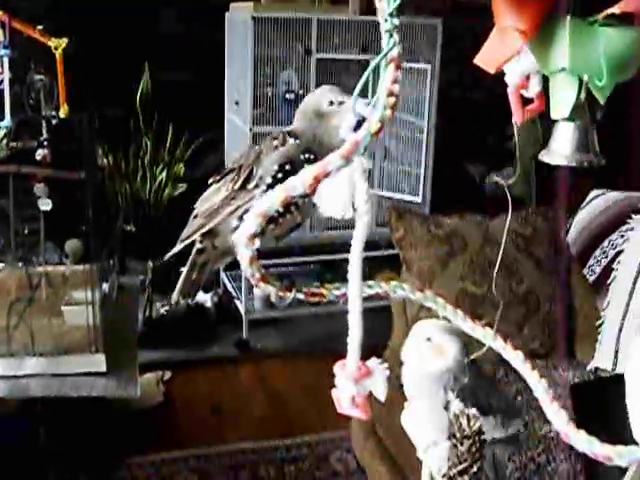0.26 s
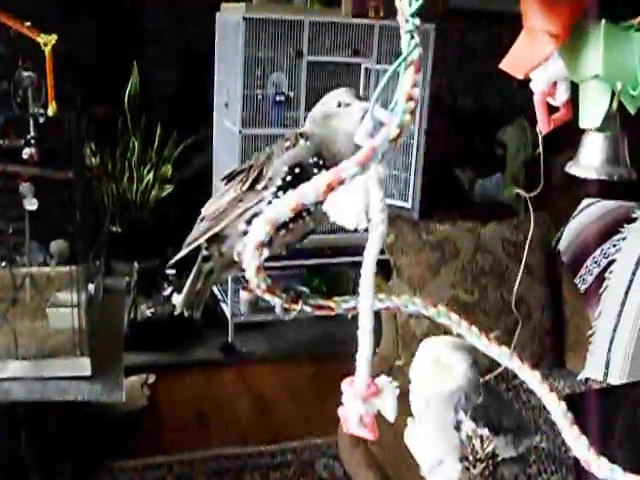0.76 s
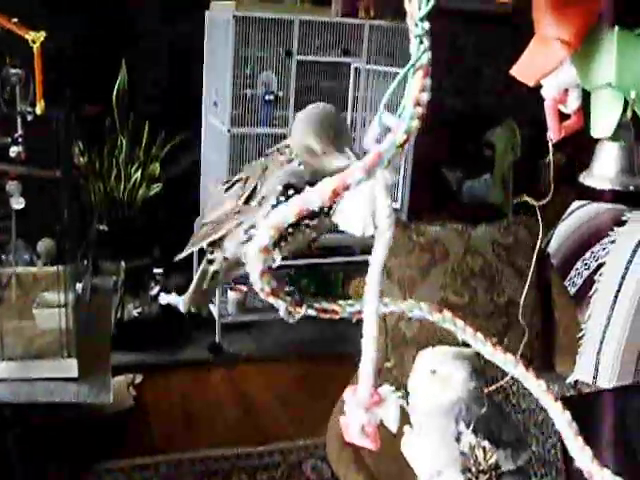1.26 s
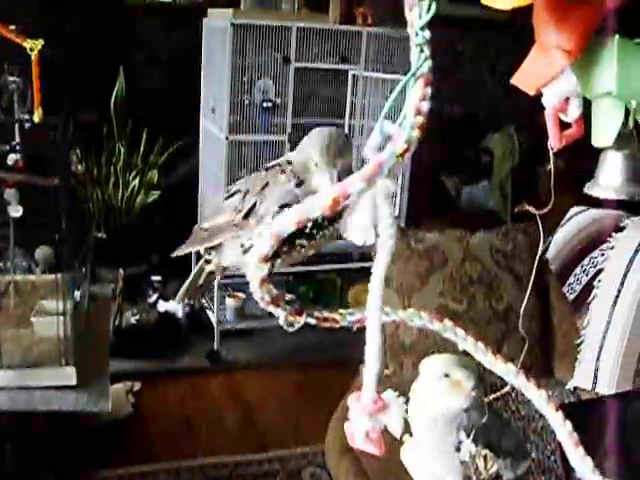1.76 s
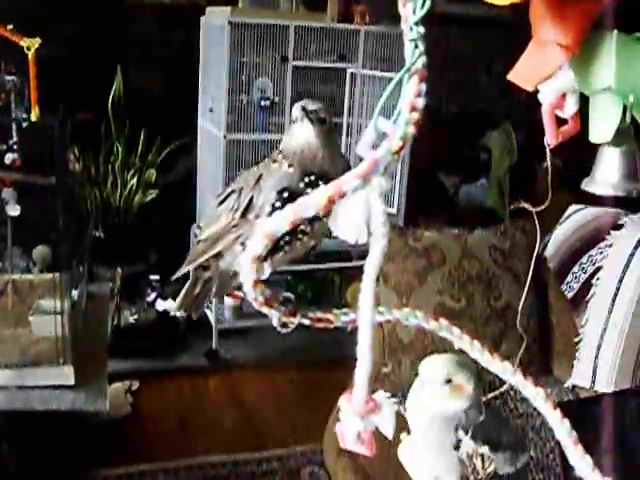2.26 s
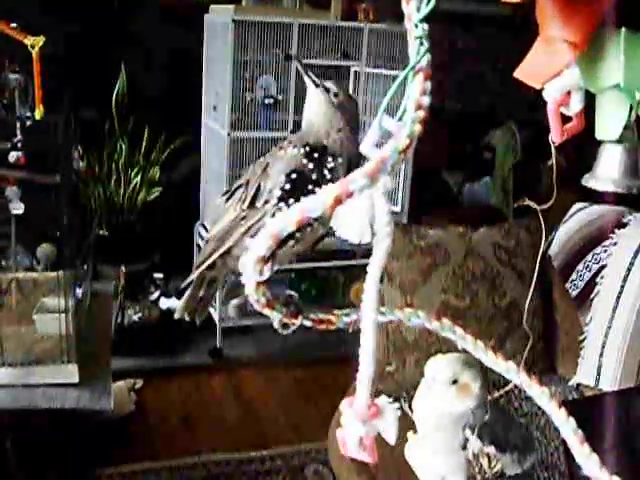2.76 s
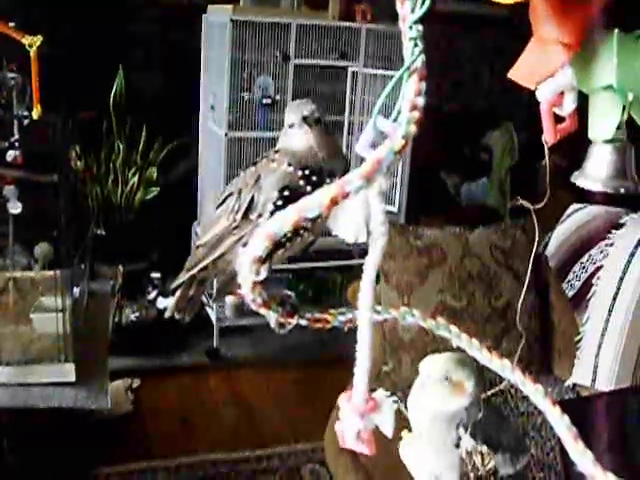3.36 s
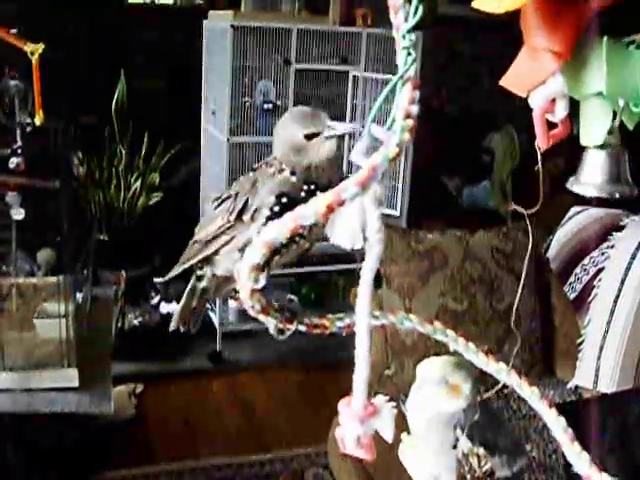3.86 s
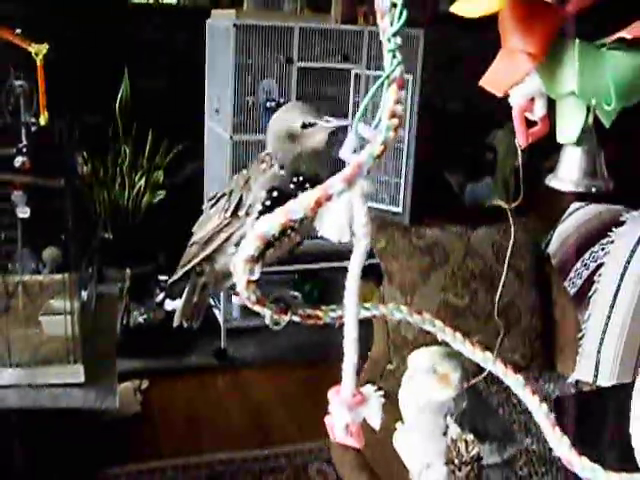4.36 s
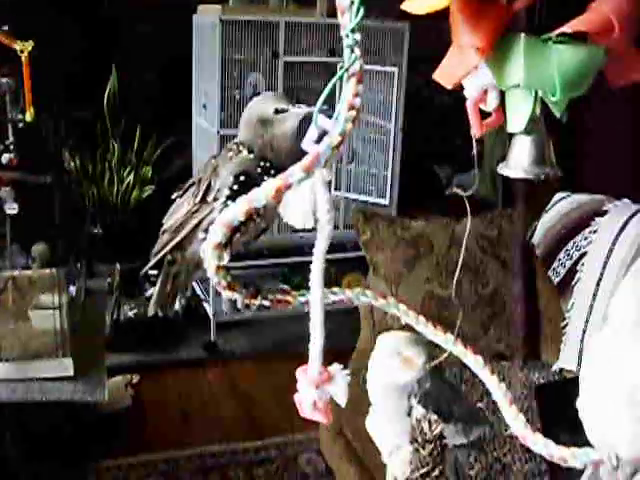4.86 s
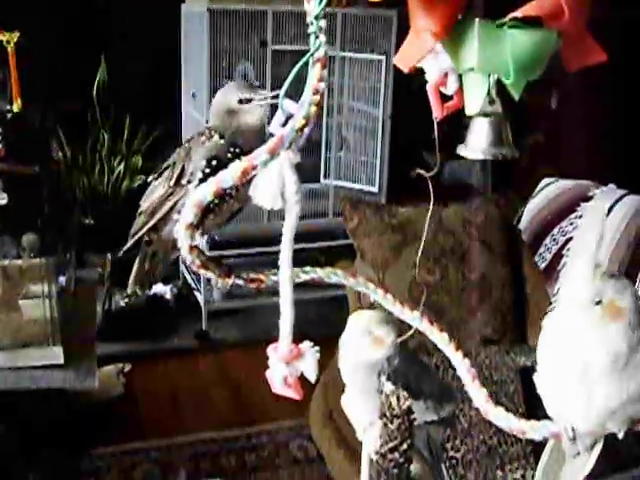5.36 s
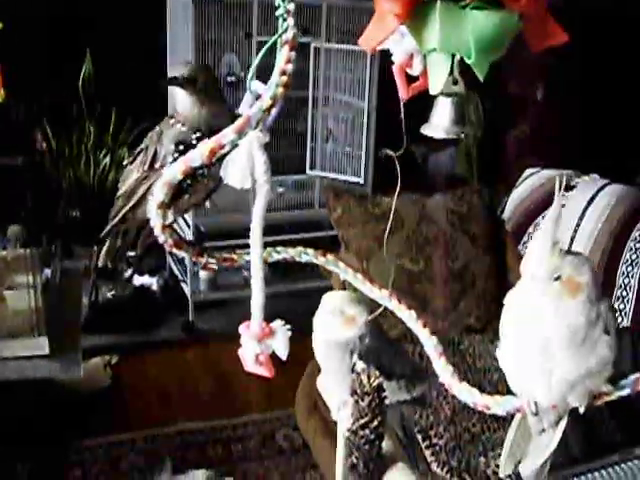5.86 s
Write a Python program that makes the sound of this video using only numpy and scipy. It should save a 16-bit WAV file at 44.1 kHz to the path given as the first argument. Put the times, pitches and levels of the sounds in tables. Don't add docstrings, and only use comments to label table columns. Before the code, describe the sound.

A pet starling on a rope perch gives gliding whistles, sharp double chips, soft chatter and thin high notes over faint camera hiss.

```python
import sys
import numpy as np
from scipy import signal
from scipy.fft import rfft, irfft
from scipy.io import wavfile
from scipy.ndimage import uniform_filter1d

SR = 44100
rng = np.random.default_rng(int(sys.argv[2]) if len(sys.argv) > 2 else 0)


def wrap_up_sound(samples):
    columns = np.atleast_2d(samples).T
    tamed = np.clip(columns, -1, 1)
    steps = np.round(tamed * 32767).astype(np.int16)
    wavfile.write(sys.argv[1], SR, steps)


def nominal_scale(level):
    x = np.asarray(level, float) / 20
    return 10 ** x


N = 269451
CUTOFF_HZ = 15720
# start_s, level_db
CHIP_STARTS = [
    (1.837, -41),
    (3.567, -42),
    (4.725, -43.5),
]


def at_hz(points, hz):
    table_hz, table_db = np.array(points).T
    return np.interp(np.log(hz), np.log(table_hz), table_db)


def wobble(size, rate_hz):
    r = np.exp(-2 * np.pi * rate_hz / SR)
    settle = 2000
    white = rng.standard_normal(max(size, 8000) + settle)[:size + settle]
    slow = signal.lfilter([1], [1, -2 * r, r * r], white)[settle:]
    return slow * np.sqrt((1 - r * r) ** 3 / (1 + r * r))


def coloured(white, gain):
    hz = np.maximum(np.fft.rfftfreq(len(white), 1 / SR), 10)
    return irfft(rfft(white) * gain(hz), len(white))


def glides(rows):
    return [[(s, from_hz, db), (s + length_s, to_hz, db)] for s, length_s, from_hz, to_hz, db in rows]


def whistles():
    # time_s, pitch_hz, level_db, pressing_db (more gives stronger overtones)
    slow_arch = [
        [(0.175, 1000, -58, -5), (0.182, 1114, -54, -2), (0.193, 1120, -57, -10), (0.205, 1485, -47.5, -15),
         (0.235, 1711, -47, -14), (0.25, 1823, -38, -13), (0.275, 1836, -53, -9), (0.29, 1940, -41.5, -14),
         (0.301, 1860, -46, -6)],
        [(0.306, 1974, -50, -18), (0.316, 2088, -46.5, -26), (0.345, 2122, -44.5, -30),
         (0.357, 2260, -43.5, -19), (0.368, 2320, -48, -14), (0.392, 2225, -43.5, -17),
         (0.402, 1920, -45.5, -21), (0.42, 1690, -44.5, -16), (0.433, 1516, -44.5, -12)],
        [(0.438, 1500, -48, -4), (0.47, 1430, -50.5, -4.5), (0.505, 1398, -53.5, 3), (0.522, 970, -58, -5)],
    ]
    big_arch = [
        [(0.663, 994, -56, -16.5), (0.68, 1400, -58, 9.5), (0.692, 1492, -46.5, 2.5), (0.706, 1595, -52, 13),
         (0.714, 1620, -68, 14)],
        [(0.72, 1620, -64, 17), (0.73, 1635, -62.5, 6), (0.747, 1846, -48, 6), (0.768, 2050, -49.5, -8),
         (0.78, 2100, -38, -16), (0.79, 2133, -36, -21), (0.802, 2470, -37, -23), (0.815, 2460, -41.5, -19)],
        [(0.82, 2510, -39, -9), (0.85, 2940, -38, -10), (0.875, 2720, -37, -11), (0.89, 2654, -45, -12),
         (0.917, 2738, -43.5, -11), (0.932, 2866, -43.5, -5), (0.96, 2367, -41, -18), (0.98, 1590, -51.5, -9)],
    ]
    high_swoop = [
        [(1.062, 8070, -68, 2), (1.076, 5870, -46.5, -25), (1.087, 5830, -51, -18), (1.092, 5400, -45, -8),
         (1.106, 5200, -46.5, -6), (1.115, 4500, -42, -12), (1.125, 4650, -45.5, -6), (1.14, 4660, -43, -3),
         (1.148, 4310, -36.5, -11)],
        [(1.153, 4500, -38.5, -3), (1.162, 4520, -46, 1), (1.18, 5010, -38.5, -4.5), (1.2, 5870, -35.5, -1),
         (1.215, 6280, -41, 0), (1.232, 6520, -42, 3), (1.242, 6170, -50, -3), (1.253, 5800, -53, -9)],
        [(1.256, 5740, -47, 0), (1.263, 4320, -46, -2), (1.272, 4500, -61, -23)],
    ]
    short_arch = [
        [(1.354, 1370, -68.5, 8), (1.363, 1470, -54, -1), (1.375, 1637, -55.5, -1), (1.39, 1845, -45.5, 1),
         (1.415, 1888, -45, 3.5), (1.425, 2080, -38, -7), (1.437, 2550, -40.5, -25), (1.452, 2545, -39.5, -7)],
        [(1.464, 2718, -38.5, -11.5), (1.495, 2924, -40, -3), (1.518, 2756, -41.5, -3),
         (1.525, 2677, -54.5, -10), (1.54, 2660, -44, -16)],
    ]
    warble = [
        [(3.89, 1375, -60.5, -14), (3.898, 1480, -51.5, -16), (3.91, 1830, -44.5, -9), (3.918, 1810, -43, -3),
         (3.923, 1948, -44.5, 5), (3.937, 1908, -44.5, 2), (3.946, 1815, -50, 3), (3.95, 1580, -52, 4)],
        [(3.954, 1648, -57, 0), (3.965, 1543, -56.5, 4), (3.982, 1603, -52, 10.5), (4.005, 1572, -47.5, 5),
         (4.012, 1922, -46.5, 8), (4.027, 2710, -43.5, -2), (4.046, 2270, -40.5, -23), (4.058, 2450, -41, -10),
         (4.069, 1816, -38.5, -4), (4.08, 1634, -51, 3)],
        [(4.083, 1700, -45, 2), (4.092, 1700, -44, 3), (4.1, 1530, -45, 3), (4.1055, 2200, -45, 3),
         (4.11, 1600, -46, 3), (4.116, 1650, -45, 3), (4.135, 1650, -46, 4), (4.164, 1610, -51, 3)],
        [(4.169, 1517, -51, 6.5), (4.187, 1369, -54.5, 1), (4.2, 1410, -53.5, 5.5), (4.213, 1420, -56.5, -5),
         (4.232, 1437, -62, -3)],
    ]
    step_arch = [
        [(5.407, 1335, -55, 1), (5.413, 1471, -56.5, 5.8), (5.424, 1398, -56.5, 9.8), (5.436, 1771, -47.5, 8.7),
         (5.453, 1770, -41.5, 3), (5.457, 1818, -46.5, 7.2), (5.472, 1800, -47.5, 11.2),
         (5.498, 1800, -45.5, 9.9), (5.505, 1916, -43, 4.4)],
        [(5.508, 1890, -52, 3), (5.524, 2333, -38.5, 2), (5.536, 2844, -37, -12), (5.555, 2931, -37.5, -4),
         (5.572, 2780, -33.5, -10), (5.6, 2370, -39.5, -20), (5.612, 1990, -38, -27), (5.622, 1550, -55.5, -10)],
    ]
    # start_db, middle_db, end_db
    beak_moves = [(-19, 4, -1.5), (-3, 10, 2), (-8, -8, -1), (0, -5, 1), (7, 6.5, 17), (6, 10, 10),
                  (20, 28, 20), (23, 15, 10), (18, 20, 18), (5, -5.5, -7), (0.5, -2, -1), (17, 10, -5),
                  (4, 1.5, -11), (1, -1.5, -5), (-9, -7, -10), (4, 1, -0.5), (0, -4.5, 16)]
    notes = []
    for note, beak in zip(slow_arch + big_arch + high_swoop + short_arch + warble + step_arch, beak_moves):
        beak_db = np.interp(np.linspace(0, 2, len(note)), range(3), beak)
        notes.append(np.column_stack([note, beak_db]))
    return syrinx(notes, jitter=.008, shimmer_db=1.5, rasp=.1, edge_s=.004)


def syrinx(notes, jitter, shimmer_db, rasp, edge_s):
    # freq_hz, level_db
    throat = [(2000, 50), (4000, 9.5), (5500, -1.5), (6800, -4), (8000, 0.5), (9500, -4), (11000, -17.5),
              (12500, -21), (14000, -32), (15500, -35)]
    quiver = 1.3
    order_fall_db, odd_db, third_db, patchy_db = 0.5, -1.5, 0.5, 3.0
    out = np.zeros(N)
    for rows in notes:
        s, pitch_hz, *controls = np.transpose(rows)
        at = np.arange(max(round((s[0] - edge_s) * SR), 0), min(round((s[-1] + edge_s) * SR), N))
        t = at / SR
        unsteady = 1 + jitter * (wobble(len(t), 70) + quiver * wobble(len(t), 220))
        share, swing_db = trill(t)
        pitch = uniform_filter1d(np.interp(t, s, pitch_hz), size=90) * unsteady * share
        phase = 2 * np.pi * np.cumsum(pitch) / SR
        edge = np.clip(np.minimum(t - s[0], s[-1] - t) / edge_s + 1, 0, 1) ** 2
        levels = [np.interp(t, s, c) for c in controls]
        rich = len(levels) > 1
        if rich:
            levels = overtones(pitch, *levels)
        for k in range(1, 10 if rich else 2):
            flicker_db = shimmer_db * min(k, 4) ** .6 * np.clip(wobble(len(t), 90), -1.7, 1.7)
            level_db = levels[min(k, 3) - 1] + flicker_db + swing_db
            if k > 2:
                level_db = level_db + at_hz(throat, k * pitch) - order_fall_db * max(k - 6, 0)
                level_db = level_db + odd_db * (k in (5, 7)) + third_db * (k == 3)
                level_db = level_db + patchy_db * wobble(len(t), 20)
            hoarse = 1 + rasp * min(k, 4) ** .5 * 2 * np.tanh(wobble(len(t), 700) / 2)
            partial = np.sin(k * phase + k * k) * (k * pitch < CUTOFF_HZ)
            out[at] += hoarse * np.sqrt(2) * nominal_scale(level_db) * edge * partial
    return out


def overtones(pitch, level_db, press_db, beak_db=0):
    # freq_hz, level_db re fundamental
    windpipe = [(2000, 6.5), (3900, -5), (4300, -7.5), (6000, -21), (8300, -20), (9200, -0.5),
                (10300, -27.5), (13000, -18.5)]
    octave_db = level_db + press_db + at_hz(windpipe, 2 * pitch)
    upper_db = -22 + press_db - 4 * np.log2(pitch / 2000) + beak_db
    upper_db = upper_db + .25 * (level_db + 46)
    return level_db, octave_db, level_db + upper_db


def trill(t):
    # first_top_s, end_s, rate_hz, pitch_share, level_db
    trill_rows = [(1.1790, 1.24, 190, .03, 4), (4.1840, 4.24, 69, .13, 1), (4.1340, 4.162, 62, .022, 1),
                  (6.0500, 6.11, 170, .035, 5), (1.468, 1.54, 75, .012, 1.5), (4.118, 4.135, 110, .015, 2),
                  (0.953, 0.985, 120, .01, 3), (0.692, 0.775, 80, .015, 2.5), (5.4615, 5.51, 94, .008, 3.5),
                  (5.585, 5.625, 135, .01, 4), (0.4450, 0.51, 90, .025, 2.5), (0.2550, 0.33, 55, .02, 1),
                  (0.342, 0.43, 65, .012, 2.5)]
    # time_s, pitch_share, level_db
    flick_rows = [(0.261, 0.067, -7), (0.281, -0.0046, 5.5), (0.367, 0.016, 6.5), (0.412, 0.044, 9),
                  (0.466, -0.047, -5), (0.774, -0.019, -1), (0.781, 0.01, 1), (0.786, 0.0047, -7),
                  (0.826, -0.0029, -2), (0.862, -0.003, -4.5), (0.881, -0.0072, -4), (0.889, 0.013, 1),
                  (0.284, -0.0068, 2), (3.977, 0.037, -1), (5.482, 0.0264, 0), (0.303, -0.0041, -5),
                  (0.907, 0.0065, -1), (0.87, 0.00019, 0), (1.443, -0.008, 3.5), (5.539, 0.0026, 6),
                  (0.929, -0.0062, -7), (0.94, 0.0062, -8), (1.131, -0.018, 3), (1.46, 0.0086, -8),
                  (1.489, -0.0021, 3), (1.499, 0.0067, -2), (3.989, 0.079, 3), (4.016, 0.0034, 8),
                  (4.039, 0.012, -2), (4.178, -0.062, 1), (5.488, 0.011, -3.5), (5.547, 0.011, -2),
                  (5.581, 0.0065, -10)]
    lead_s, ramp_s, flick_s = .018, 0.014, 0.0059
    share, swing_db = np.zeros(len(t)), np.zeros(len(t))
    for top_s, end_s, rate_hz, depth, level_db in trill_rows:
        ramp = np.clip(np.minimum(t - top_s + lead_s, end_s - t) / ramp_s, 0, 1)
        beat = np.cos(2 * np.pi * rate_hz * (t - top_s)) * ramp
        share, swing_db = share + depth * beat, swing_db + level_db * beat
    for s, depth, level_db in flick_rows:
        flick = np.clip(1 - abs(t - s) / flick_s, 0, 1)
        share, swing_db = share + depth * flick, swing_db + level_db * flick
    return 1 + share, swing_db


def chips():
    # after_s, pitch_hz, level_db, pressing_db
    chip_shape = [
        [(0.001, 2800, -18, 8), (0.005, 2984, -12, 12), (0.0095, 3200, -6, 0), (0.012, 3800, -6, -8),
         (0.017, 3850, -19, -6), (0.023, 3880, -12, -8), (0.027, 3800, -21, -4)],
        [(0.0445, 3080, -8, 0), (0.048, 3110, -3, 0), (0.052, 3140, -2, -3), (0.0565, 3150, -9, -5),
         (0.0585, 3400, -3, -6), (0.0605, 3850, -11, -9), (0.064, 3800, -20, -8)],
    ]
    beak_db = -8
    ring_hz, ring_t60_s, ring_db = 3140, 0.1, -5
    notes = []
    for s, db in CHIP_STARTS:
        for note in chip_shape:
            placed = np.array(note) * [1, rng.normal(1, .005), 1, 1] + [s, 0, db, 0]
            notes.append(np.column_stack([placed, np.full(len(note), beak_db)]))
    voice = syrinx(notes, jitter=.006, shimmer_db=1.5, rasp=.15, edge_s=.002)
    r = nominal_scale(-60 / (ring_t60_s * SR))
    poles = [1, -2 * r * np.cos(2 * np.pi * ring_hz / SR), r * r]
    ring = signal.lfilter([1 - r, 0, r - 1], poles, voice + 1e-18)
    return voice + nominal_scale(ring_db) * ring


def chatter():
    # top_s, half_length_s, top_hz, level_db, pressing_db
    syllables = [(4.474, 0.012, 1804, -52.5, -15), (4.49, 0.0087, 1223, -59.5, -3),
                 (4.538, .011, 1617, -58.5, -1), (4.56, 0.014, 1853, -53, -8),
                 (4.579, 0.0071, 1373, -61, -4.5), (4.64, 0.013, 2263, -54, 8.5),
                 (4.665, 0.012, 1700, -61, -12)]
    # time_s, pitch_hz, level_db, pressing_db, beak_db
    lead = [
        [(4.365, 3160, -60, 2, -6), (4.373, 1870, -52.5, -11, 1), (4.378, 2030, -53, -8, 3),
         (4.384, 2840, -63, -6, -8), (4.39, 1920, -50, -5, -3)],
        [(4.368, 4280, -70, -20, -18), (4.374, 2870, -61, -16, -20), (4.383, 4330, -60, -20, -20),
         (4.39, 3240, -61, -20, -20)],
    ]
    # top_s, half_length_s, top_hz, level_db, beak_db
    rattle = [(4.383, 0.0039, 1465, -57, 6), (4.402, 0.0058, 1595, -56, 12),
              (4.4135, 0.0038, 1660, -50, 19.5), (4.426, .004, 1604, -57.5, 15),
              (4.439, 0.0043, 1520, -59, 14), (4.454, 0.005, 1470, -61, 11), (4.474, .003, 1780, -66, 20),
              (4.483, .003, 1495, -69, 12)]
    sag, edge_db, edge_press_db, beak_open_db = .28, -13, -3, 3
    rattle_sag, rattle_edge_db, rattle_press_db = 0.097, -4.5, -1.5
    humps = []
    for s, half_s, hz, db, press_db in syllables:
        end = (hz * (1 - sag), db + edge_db, press_db + edge_press_db, beak_open_db)
        humps.append([(s - half_s, *end), (s, hz, db, press_db, beak_open_db), (s + half_s, *end)])
    beats = []
    for s, half_s, hz, db, beak_db in rattle:
        end = (hz * (1 - rattle_sag), db + rattle_edge_db, rattle_press_db, beak_db)
        beats.append([(s - half_s, *end), (s, hz, db, rattle_press_db, beak_db), (s + half_s, *end)])
    return syrinx(lead + humps + beats, jitter=.008, shimmer_db=1.5, rasp=.13, edge_s=.003)


def hoarse_notes():
    # time_s, pitch_hz, level_db
    old_tail = [
        [(0.0, 2054, -45), (0.012, 1960, -57), (0.035, 1930, -65), (0.14, 1950, -80)],
    ]
    # start_s, length_s, from_hz, to_hz, level_db
    buzz = [(5.92, .018, 5400, 8100, -81), (5.942, 0.01, 6900, 7200, -73), (5.942, .018, 4900, 4730, -82),
            (5.957, .008, 6700, 7300, -70), (5.966, 0.03, 4400, 6200, -76), (5.98, .009, 8000, 9450, -73),
            (5.991, 0.014, 6600, 6800, -61.5), (6.0, 0.024, 8200, 7900, -74),
            (6.011, 0.016, 5600, 6400, -66), (6.022, .018, 4080, 4570, -73),
            (6.036, 0.0077, 5560, 6250, -65), (6.045, 0.016, 6370, 6600, -56.5),
            (6.08, 0.022, 4750, 6600, -67), (6.1, .009, 6650, 6500, -60.5)]
    return syrinx(old_tail + glides(buzz), jitter=.018, shimmer_db=3.0, rasp=.35, edge_s=.003)


def thin_notes():
    # time_s, pitch_hz, level_db
    thin = [
        [(4.853, 8250, -69), (4.868, 8550, -56.5), (4.885, 7920, -59), (4.91, 7370, -68), (4.93, 7700, -56.5),
         (4.942, 7740, -60.5), (4.955, 5900, -72), (4.968, 5080, -76)],
    ]
    # start_s, length_s, from_hz, to_hz, level_db
    faint = [(0.857, .008, 3280, 3980, -54), (0.9, .02, 6600, 6930, -58), (0.901, .02, 9000, 9800, -59),
             (0.901, .009, 3100, 4100, -52), (1.705, .025, 1360, 1280, -70), (4.865, .03, 5200, 4740, -73),
             (4.872, .012, 10200, 9800, -82), (4.92, .015, 4250, 4050, -80),
             (4.918, .012, 14900, 15650, -78), (4.932, .012, 15650, 14600, -77),
             (1.178, .012, 15400, 15500, -72)]
    return syrinx(thin + glides(faint), jitter=.012, shimmer_db=3.0, rasp=.15, edge_s=.004)


def air_events():
    # peak_s, length_s, level_db
    voice_breaks = [(0.511, .013, -74), (0.851, .018, -52), (0.897, .012, -50.5), (0.98, .0071, -72),
                    (1.208, .0025, -51), (3.95, .0041, -68), (4.012, .014, -62), (4.104, .0067, -60)]
    throat_rasps = [(1.259, .0065, -66), (4.199, .027, -68), (4.382, .02, -64), (4.415, .057, -66),
                    (4.468, .03, -64), (4.555, .04, -67), (4.635, .04, -68), (4.5, .03, -68)]
    high_grains = [
        (1.198, 0.0086, -61),
        (4.375, 0.028, -71),
        (4.45, 0.046, -69),
        (4.638, 0.016, -67),
    ]
    soft_washes = [(1.603, .12, -78), (2.926, .15, -79), (4.035, .03, -62), (4.782, .034, -67.5),
                   (4.642, .045, -64), (4.565, .02, -70), (5.138, .1, -78), (5.508, .035, -62)]
    buzz_air = [
        (5.95, 0.036, -71),
        (5.995, 0.047, -66.5),
        (6.058, 0.07, -83),
    ]
    # low_hz, high_hz
    air_bands = [
        (2320, 10200),
        (1280, 5800),
        (8240, 9400),
        (2840, 6400),
        (4500, 9300),
    ]
    # after_s, length_s, low_hz, high_hz, level_db re chip
    chip_air = [(0.005, .012, 2500, 6500, -21), (.047, 0.016, 2400, 5600, -21),
                (.013, 0.027, 8800, 12300, -33), (.014, .012, 5700, 7000, -25), (.05, .02, 5700, 6600, -27),
                (.064, .025, 3500, 4100, -26)]
    kinds = voice_breaks, throat_rasps, high_grains, soft_washes, buzz_air
    rows = []
    for band, events in zip(air_bands, kinds):
        rows += [(s, length_s, *band, db) for s, length_s, db in events]
    for s, db in CHIP_STARTS:
        rows += [(s + after_s, *shape, db + under_db) for after_s, *shape, under_db in chip_air]
    return rows


def puffs():
    tilt_db_per_octave = -4.5
    out = np.zeros(N)
    for s, length_s, low_hz, high_hz, level_db in air_events():
        at = np.arange(round((s - length_s / 2) * SR), min(round((s + 2 * length_s) * SR), N))
        grain_db = 3.5 * wobble(len(at), 200) + trill(at / SR)[1]
        air = rng.standard_normal(SR)[:len(at)] * nominal_scale(grain_db)
        band = signal.butter(4, [low_hz, high_hz], "band", fs=SR, output="sos")
        air = signal.sosfilt(band, air) * np.sqrt(SR / 2 / (high_hz - low_hz))
        late = (at / SR - s) / length_s
        push = np.cos(np.pi * np.where(late < 0, late, late / 4)) ** 2
        out[at] += nominal_scale(level_db) * air * push
    return coloured(out, lambda hz: nominal_scale(tilt_db_per_octave * np.log2(hz / 4000)))


def far_birds():
    # start_s, length_s, from_hz, to_hz, level_db
    calls = [
        (1.29, .07, 2300, 2260, -70),
        (2.42, .25, 2420, 2380, -84),
        (5.13, .08, 2700, 2770, -83),
    ]
    return syrinx(glides(calls), jitter=.015, shimmer_db=3.0, rasp=.4, edge_s=.015)


def fade(rounds):
    return nominal_scale(-60 * rounds) + nominal_scale(-18 - 30 * rounds)


def room(x):
    # freq_hz, t60_s
    room_t60 = [(500, 0.064), (2500, 0.22), (6000, 0.2), (12000, 0.1)]
    room_db, gap_s = -10.5, 0.002
    t, tail = np.arange(SR // 2) / SR, 0
    for hz in 250 * 2 ** np.arange(0, 6.5, .5):
        band = signal.butter(2, [hz / 2 ** .25, hz * 2 ** .25], "band", fs=SR, output="sos")
        tail = tail + signal.sosfilt(band, rng.standard_normal(len(t))) * fade(t / at_hz(room_t60, hz))
    tail = tail * (t > gap_s)
    return nominal_scale(room_db) * signal.fftconvolve(x, tail / np.sqrt(np.sum(tail ** 2)))[:N]


def camera():
    # freq_hz, density_db_per_hz
    hiss_shape = [(12, -29), (20, -2), (137, -3), (650, -13), (707, -10.5), (790, -14), (908, -12.5),
                  (1130, -15), (1230, -15), (2340, -19), (6040, -30.5), (7760, -32.5), (8670, -34.5),
                  (15600, -40.5)]
    slip_times = [1.928, 2.105, 2.39, 3.335, 4.34, 5.19, 5.355]
    # freq_hz, level_db
    tones = [
        (7750, -88),
        (15370, -98),
        (15503, -98),
    ]
    hiss_db, whine_db = -63, -77.5
    whine_hz, flips_per_s, first_flip_s = 7685.5, 58.75, 0.0107
    slip_hz, slip_s = 337.4, 0.007
    t = np.arange(N) / SR
    hiss = coloured(rng.standard_normal(N), lambda hz: nominal_scale(at_hz(hiss_shape, hz)))
    slip = sum(np.exp(-((t - s) / slip_s) ** 2) for s in slip_times)
    sign = np.clip(12 * np.sin(np.pi * flips_per_s * (t - first_flip_s)), -1, 1)
    whine = sign * np.sin(2 * np.pi * np.cumsum(whine_hz + slip_hz * slip) / SR)
    lines = sum(nominal_scale(line_db) * np.sin(2 * np.pi * hz * t) for hz, line_db in tones)
    return nominal_scale(hiss_db) * hiss / np.std(hiss) + np.sqrt(2) * (nominal_scale(whine_db) * whine + lines)


def scene():
    bird = whistles() + chatter() + chips()
    bird += hoarse_notes() + thin_notes() + far_birds()
    bird += puffs()
    return (bird + room(bird) + camera())[None]


def top_cut(x):
    return signal.sosfilt(signal.butter(12, 15710, fs=SR, output="sos"), x)


def record(dry):
    low_pass = signal.cheby2(12, 50, CUTOFF_HZ + 500, fs=SR, output="sos")
    mix = signal.sosfilt(low_pass, dry)
    return top_cut(mix)


dry = scene()
out = record(dry)
wrap_up_sound(out)
```